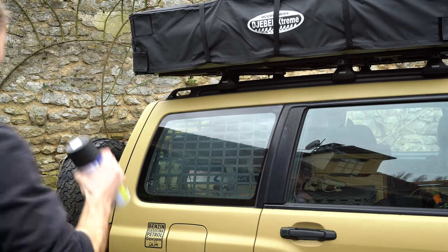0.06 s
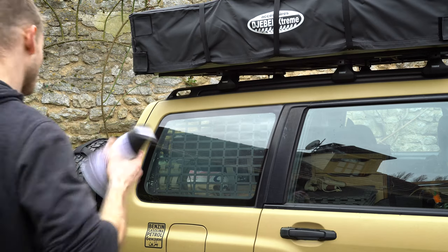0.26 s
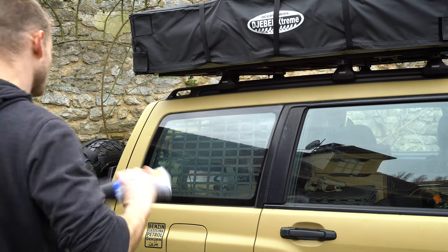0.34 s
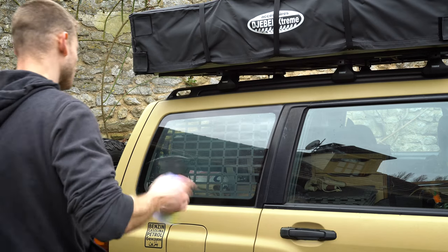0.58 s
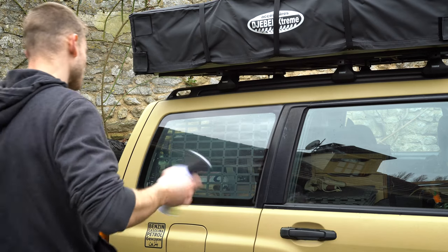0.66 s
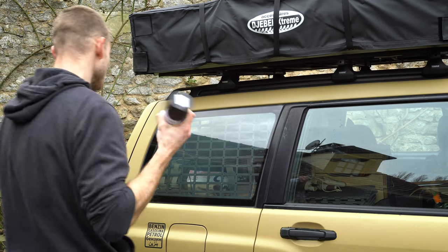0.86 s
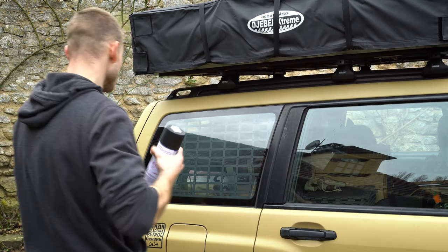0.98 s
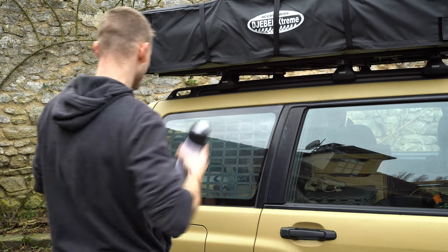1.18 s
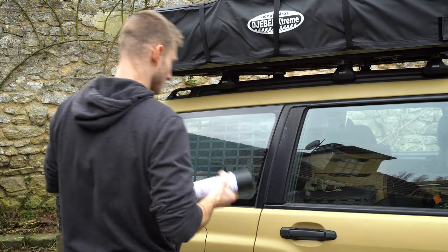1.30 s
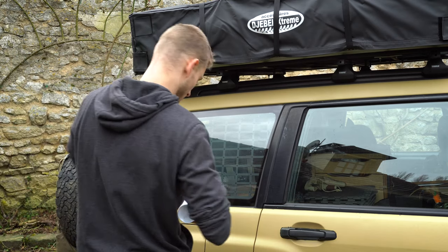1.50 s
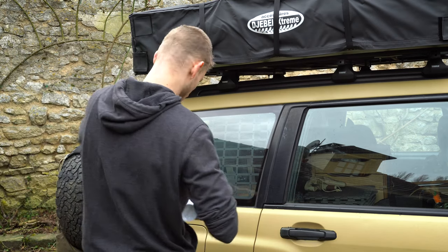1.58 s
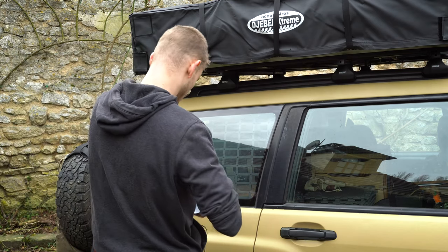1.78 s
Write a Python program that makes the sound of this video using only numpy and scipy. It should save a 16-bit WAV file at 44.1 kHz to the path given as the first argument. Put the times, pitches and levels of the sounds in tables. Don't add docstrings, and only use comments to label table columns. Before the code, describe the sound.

Sharp bright rattling of a mixing ball inside a shaken spray can beside a parked car

```python
import sys
import numpy as np
from scipy import signal
from scipy.fft import rfft, irfft, next_fast_len
from scipy.io import wavfile
from scipy.ndimage import uniform_filter1d

SR = 44100
rng = np.random.default_rng(int(sys.argv[2]) if len(sys.argv) > 2 else 0)


def volts_from_db(level):
    exponent = np.asarray(level, float) / 20
    return 10 ** exponent


def waveform_to_disk(signal):
    frames = np.transpose(np.atleast_2d(signal))
    scaled = np.clip(frames, -1, 1) * 32767
    samples = np.round(scaled).astype(np.int16)
    wavfile.write(sys.argv[1], SR, samples)


N = 81585


def unit(x):
    return x / np.sqrt(np.mean(x ** 2) + 1e-20)


def along(points, hz):
    f, value = np.transpose(points)
    return np.interp(np.log(hz + 1), np.log(f + 1), value)


def filtered(x, response):
    size = next_fast_len(len(x) + 8192)
    spectrum = rfft(x, size) * response(np.fft.rfftfreq(size, 1 / SR))
    return irfft(spectrum, size)[:len(x)]


def fading(t60, seconds):
    t = np.arange(round(seconds * SR)) / SR
    x = rng.standard_normal(len(t)) * volts_from_db(-60 * t / t60)
    return x / np.linalg.norm(x)


def hush():
    # frequency in Hz, spectral density in dB per Hz.
    spectrum = [(20, 1.5), (50, -1), (120, -0.5), (300, -6), (800, -12), (1600, -10), (3000, -20.5),
                (16000, -38)]
    level_db = -49
    noise = rng.standard_normal(N)
    return volts_from_db(level_db) * unit(filtered(noise, lambda hz: volts_from_db(along(spectrum, hz))))


def rustle():
    # time in seconds, level of the movement in dB.
    movement = [(0, -47), (.12, -49.5), (.6, -44.5), (1.0, -53), (1.07, -58), (1.15, -49.5), (1.5, -57.5),
                (1.6, -80), (1.655, -71), (1.67, -53), (1.74, -42), (1.85, -56)]
    # frequency in Hz, spectral density in dB per Hz.
    cloth = [(290, -37), (500, -5), (1080, -6.5), (1210, 5), (2130, -12), (3290, -7.5), (8330, -12),
             (16000, -35)]
    noise = rng.standard_normal(N)
    grain_db = 3.8 * unit(uniform_filter1d(rng.standard_normal(N), size=60))
    grains = noise * volts_from_db(grain_db)
    level_db = np.interp(np.arange(N) / SR, *np.transpose(movement))
    return volts_from_db(level_db) * unit(filtered(grains, lambda hz: volts_from_db(along(cloth, hz)) * (hz > 400)))


def click(thunk_db, bright_db, clack_db, grip_db, base_db, lasting):
    # frequency in Hz, level in dB, t60 in seconds.
    wall_modes = [(1055, -13.5, 0.02), (1295, -0.5, 0.012), (1585, 4, .022), (1744, 6, 0.011),
                  (1899, 0.5, 0.018), (2258, 1.5, 0.015), (3150, 7.5, 0.0067), (3640, 1.5, 0.01),
                  (5240, 3.5, 0.0092), (6210, -0.5, 0.009), (7750, 6, 0.0057), (8650, 4, 0.0074),
                  (11960, -15, 0.0095), (13000, -5.5, 0.0071)]
    mode_scatter_db, pitch_scatter, phase_scatter = 2.5, 0.04, 0.5
    grip_below_hz, base_hz, clack_hz = 1400, 6500, 3700
    crack_db, crack_t60, rise_s = 7.5, 0.004, 0.0006
    cap_t60, cap_rise_s = 0.038, 0.0051

    t = np.arange(SR // 10) / SR
    hz, db, t60 = np.transpose([*wall_modes, *wall_modes])[:, :, None]
    draw = rng.standard_normal((3, len(hz), 1))
    db = db + lasting * mode_scatter_db * draw[0]
    db = db + bright_db * (hz > 7000)
    db = db + clack_db * np.exp(-np.log2(hz / clack_hz) ** 2 / 0.5)
    db = db + grip_db * (hz < grip_below_hz)
    db = db + base_db * np.exp(-np.log2(hz / base_hz) ** 2 / 0.024)

    mode_hz = hz * (1 + pitch_scatter * draw[1])
    swing = np.sin(2 * np.pi * mode_hz * t + phase_scatter * draw[2])
    ring = (volts_from_db(db - 60 * t / t60 / lasting) * swing).sum(axis=0)
    crack = volts_from_db(crack_db + bright_db - 60 * t / crack_t60) * rng.standard_normal(len(t))
    ring = (ring + crack) * (1 - np.exp(-t / rise_s))
    ring = ring / np.sqrt(np.sum(ring ** 2) / 44) / 2

    cap_hz = 523 * (1 + pitch_scatter * draw[2, 0, 0])
    cap_level = volts_from_db(thunk_db - 13.5 - 60 * t / cap_t60 / lasting)
    cap = cap_level * (1 - np.exp(-t / cap_rise_s)) * np.sin(2 * np.pi * cap_hz * t)
    return ring + cap


def yard_tail():
    # frequency in Hz, t60 in seconds.
    decay = [(400, 0.28), (1700, 0.27), (6000, 0.29), (14000, 0.27)]
    hz, t, z = signal.stft(rng.standard_normal(SR // 2), SR, nperseg=256)
    z = z * volts_from_db(-60 * t / along(decay, hz)[:, None])
    tail = signal.istft(z, SR, nperseg=256)[1][:SR // 2]
    return tail / np.linalg.norm(tail)


def space(s):
    # time in seconds, lag of the car's echo in seconds.
    car_gap = [(0, 0.007), (.5, 0.0042), (1.0, 0.0038), (1.85, 0.003)]
    car_db, near_db, yard_db, wall_db = -3, -9, -9.5, -18
    smear_t60, near_t60, wall_s = 0.022, 0.09, 0.029
    out = volts_from_db(yard_db) * np.pad(yard_tail(), (300, 0))[:SR // 2]
    lag = round(np.interp(s, *np.transpose(car_gap)) * SR)
    out[lag:][:SR // 50] += volts_from_db(car_db) * fading(smear_t60, 0.02)
    out[lag:][:SR // 5] += volts_from_db(near_db) * fading(near_t60, 0.2)
    out[round(wall_s * SR):][:SR // 50] += volts_from_db(wall_db) * fading(smear_t60, 0.02)
    return out


def rattle():
    # start in seconds, peak in dB, end-cap thunk in dB, brightness in dB, clack in dB.
    blows = [(0.215, -3, 2, 6, 4.5), (0.2849, -11.5, -6, 4.5, 0.5), (0.3279, -12, -10, -1.5, -2),
             (0.4268, -4, 4, 2, 4), (0.4726, -4, -5.5, 3.5, 2), (0.554, -2.5, -18, 5.5, 7.5),
             (0.6992, -5.5, -4.5, 1.5, -2.5), (0.7188, -6, 6, 7, 9.5), (0.782, -12.5, -7, -0.5, -2),
             (0.8614, -11, 8, 10.5, 4.5), (0.917, -4, 1, 3, 8), (0.9667, -10.5, -11, -4, -7),
             (1.1809, -1, -3.5, 2.5, 7), (1.2268, -13, -4, -4.5, -7), (1.292, -8, 1.5, -4, -1.5),
             (1.3191, -14.5, 3, -1.5, 2), (1.3958, -4, 2.5, 1, -5), (1.4761, -10, -7.5, -5, -6),
             (1.661, -17, -10, -4.5, -5.5)]
    taps = [(0.062, -20.5, 5.5, 2.5, 7), (0.1929, -22, -7, -14, 6), (0.2409, -22, -4, -19, -24),
            (0.3443, -15.5, -10, -8, -4), (0.501, -25, 7, 8, 20), (0.6367, -22, -14, 1, -9),
            (0.7398, -12, -7, 1, 4), (0.8903, -22.5, -25, 2, 4), (1.1022, -36, 12, -12, -8),
            (1.1323, -29.5, -1, 0, 2), (1.1468, -22.5, 7.5, 0, 3), (1.259, -23.5, -14, -14, -8),
            (1.339, -18.5, -12, -11, -9), (1.3538, -23, -24, -4, -8), (1.413, -14, 4, -6, -3),
            (1.5406, -25.5, -27, -3.5, 3), (1.555, -19, -13, -28, -37), (1.71, -42, -12, 0, -8),
            (1.724, -29.5, -6.5, 13, 15)]
    late_tap = [
        (1.1735, -23, -20, 2, 10),
    ]
    # time in seconds, low modes freed by a loose grip in dB,
    # base turned to the listener in dB.
    tumble = [(0.062, 0, -4), (.22, -16, -1.5), (.33, 5.5, -7), (.43, 8.5, 2), (.47, 1, -3),
              (.55, -13.5, -13), (.64, 13.5, 2), (.70, 7, 1.5), (.78, 10, 0), (.86, 4, 18), (.92, 5, 11),
              (.97, 4.5, 2), (1.18, -13, 2), (1.29, 4, 3.5), (1.40, -9.5, 14), (1.48, 3, 0.5),
              (1.56, 3, -2), (1.66, 6.5, 2)]
    echo_blur, echo_dull_hz, radiates_hz = 0.55, 9600, 389

    out = np.zeros(N + SR)
    dull = signal.butter(1, echo_dull_hz, fs=SR)
    when, grip, base = np.transpose(tumble)
    for s, db, *colour in [*blows, *taps, *late_tap]:
        colour = colour + [np.interp(s, when, grip), np.interp(s, when, base)]
        sent_away = signal.lfilter(*dull, click(*colour, echo_blur))
        heard = signal.fftconvolve(sent_away, space(s))
        heard[:SR // 10] += click(*colour, 1)
        out[round((s + 0.0004) * SR):][:len(heard)] += volts_from_db(db + 1) * heard
    no_bass = signal.butter(6, radiates_hz, "high", fs=SR, output="sos")
    return signal.sosfilt(no_bass, out[:N])


def steps():
    # start in seconds, push in dB, scuff in dB.
    footfalls = [
        (0.1045, -36, -52),
        (1.776, -31, -41),
    ]
    push_hz, push_t60 = 261, 0.037
    scuff_hz, scuff_width_hz, scuff_rise_s = 820, 400, 0.023

    def band(f):
        damping = 1j * f * scuff_width_hz
        return damping / (scuff_hz ** 2 - f * f + damping)

    out = np.zeros(N + SR)
    t = np.arange(SR // 4) / SR
    u = t / scuff_rise_s
    for s, push_db, scuff_db in footfalls:
        push = volts_from_db(push_db - 60 * t / push_t60) * np.sin(2 * np.pi * push_hz * t)
        gravel = unit(filtered(rng.standard_normal(len(t)), band))
        scuff = volts_from_db(scuff_db) * (u + 0.18) * np.exp(1 - u) * gravel
        out[round(s * SR):][:len(t)] += push + scuff
    return out[:N]


def scene():
    return (rattle() + rustle() + steps() + hush())[None]


def low_pass(x):
    return signal.sosfilt(signal.butter(12, 16670, fs=SR, output="sos"), x)


def record(dry):
    top_hz = 16000
    heard = filtered(dry[0], lambda hz: 1 / (1 + (hz / top_hz) ** 70))
    return low_pass(heard[None])


dry = scene()
out = record(dry)
waveform_to_disk(out)
```